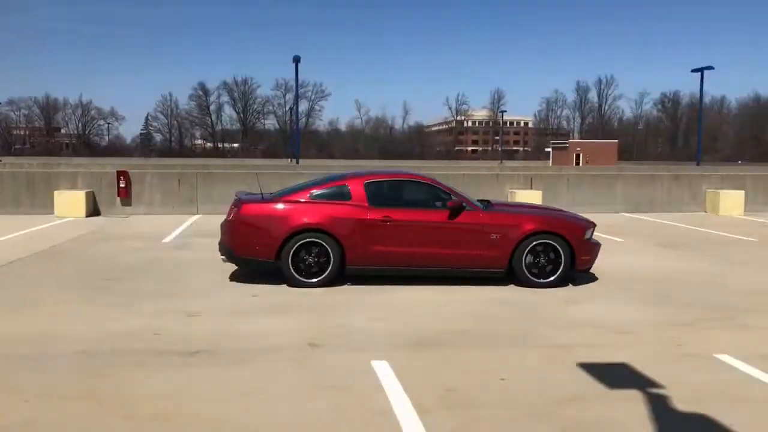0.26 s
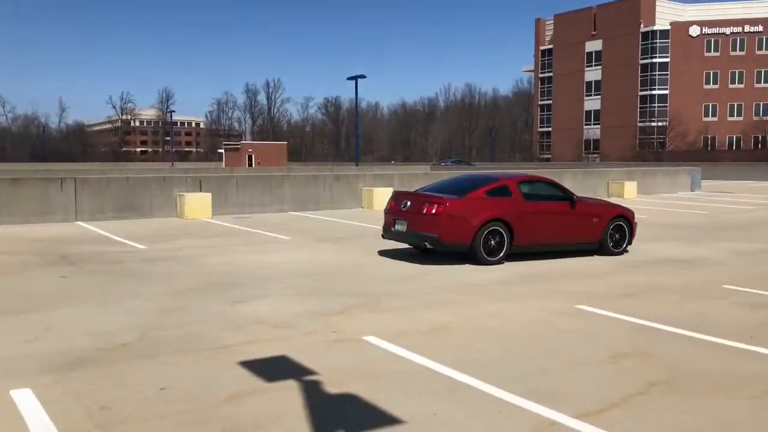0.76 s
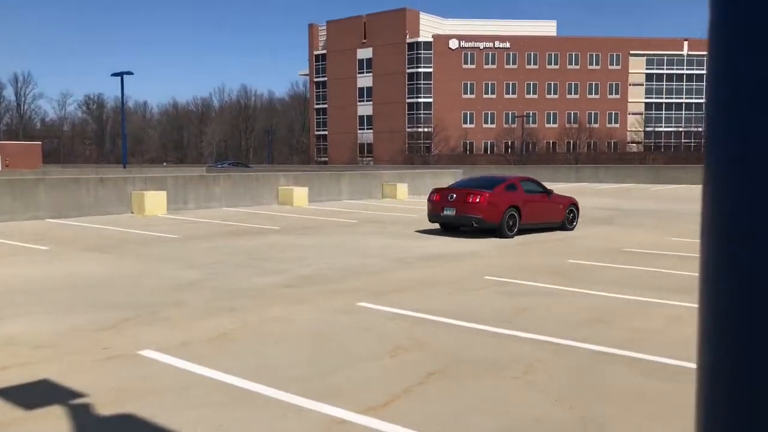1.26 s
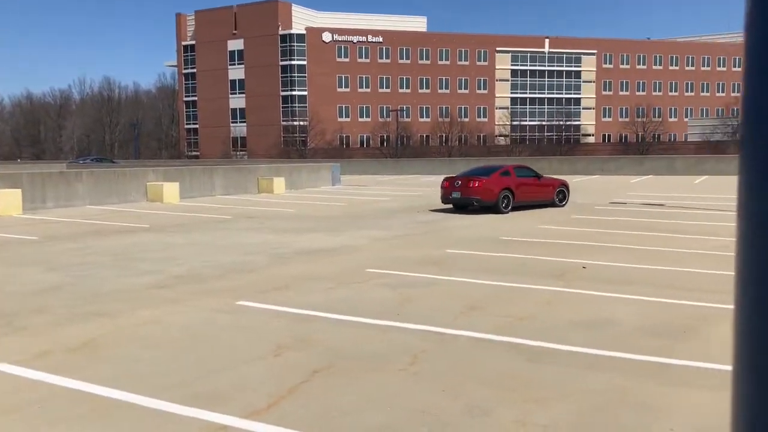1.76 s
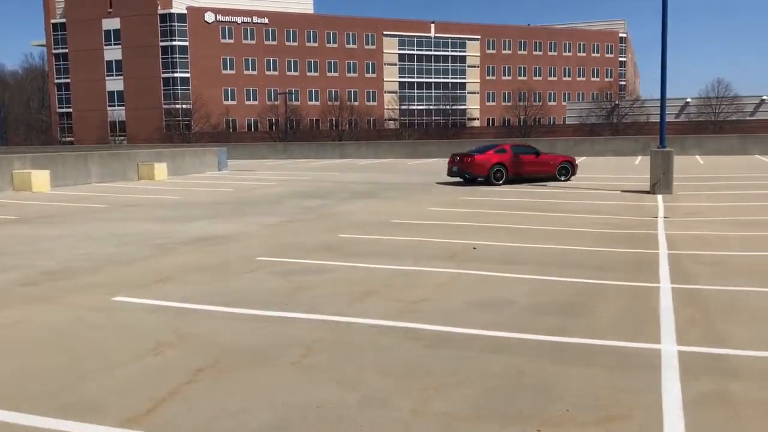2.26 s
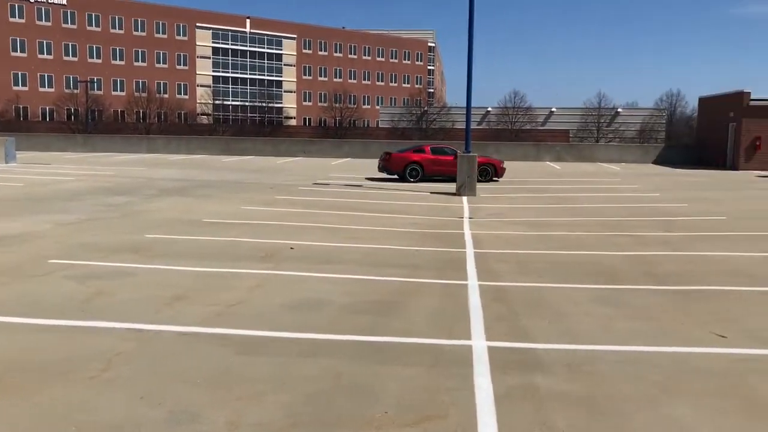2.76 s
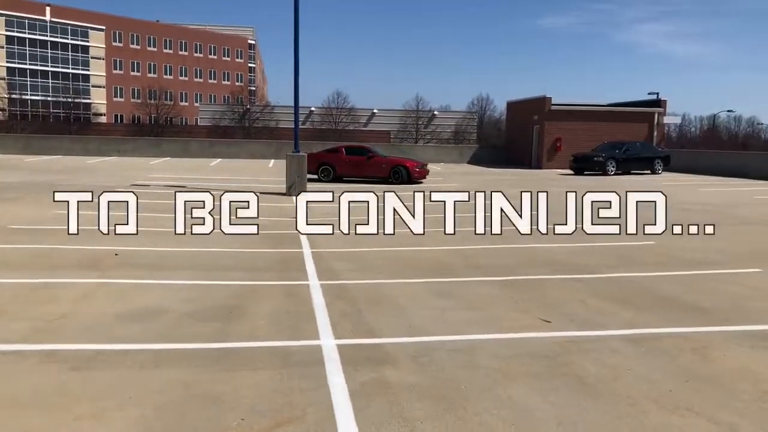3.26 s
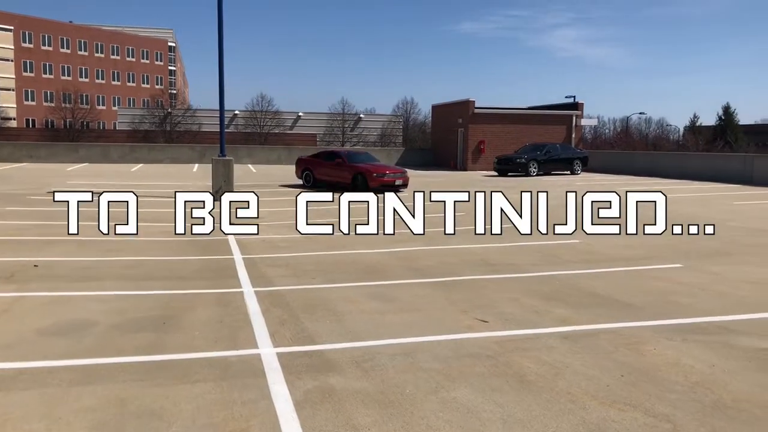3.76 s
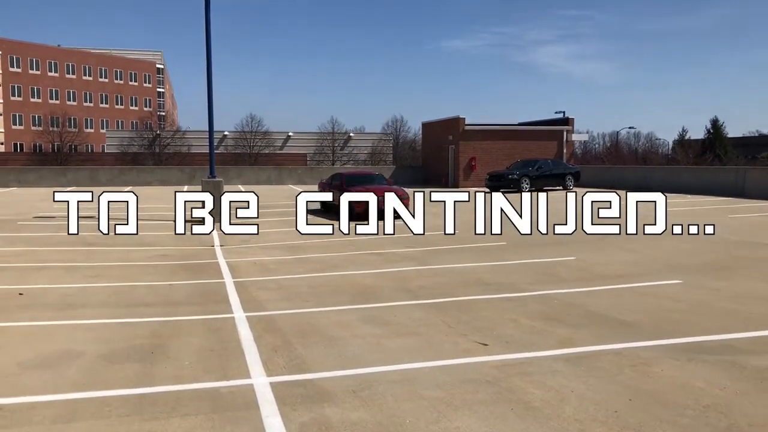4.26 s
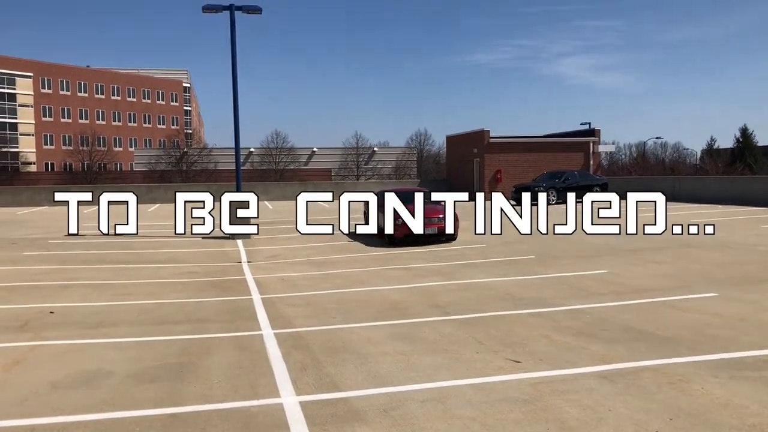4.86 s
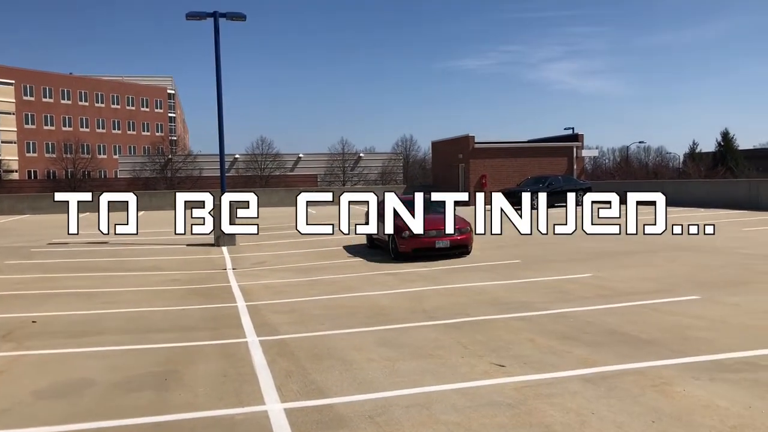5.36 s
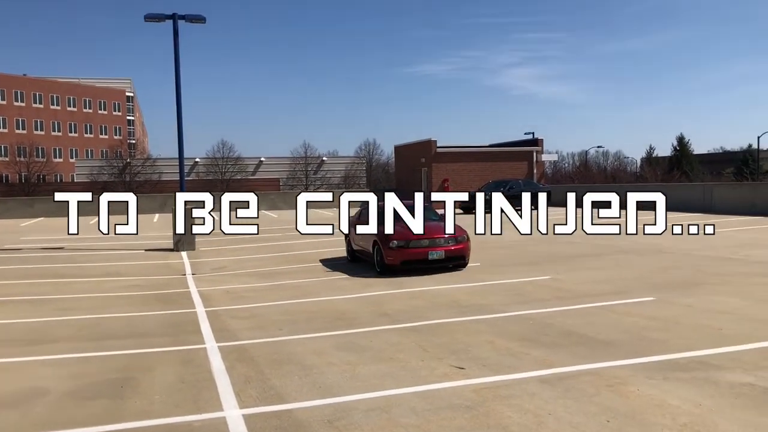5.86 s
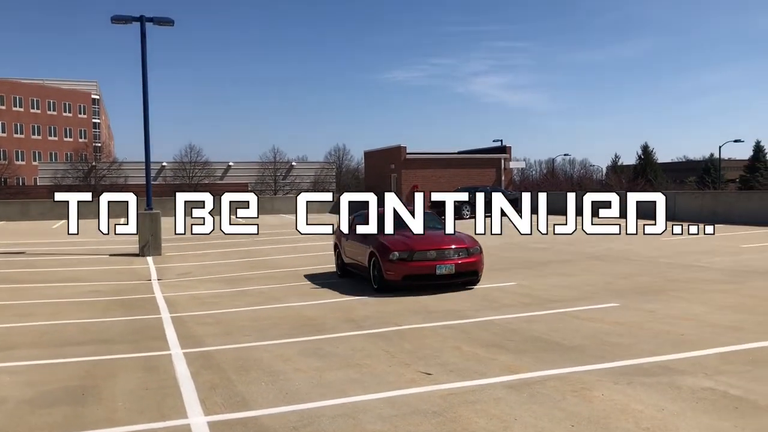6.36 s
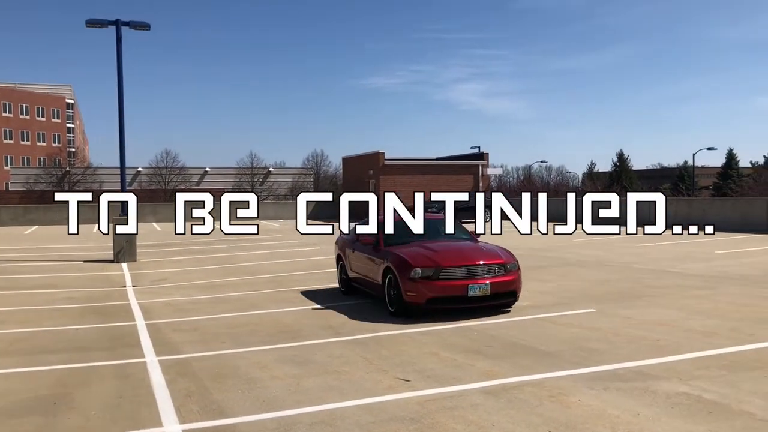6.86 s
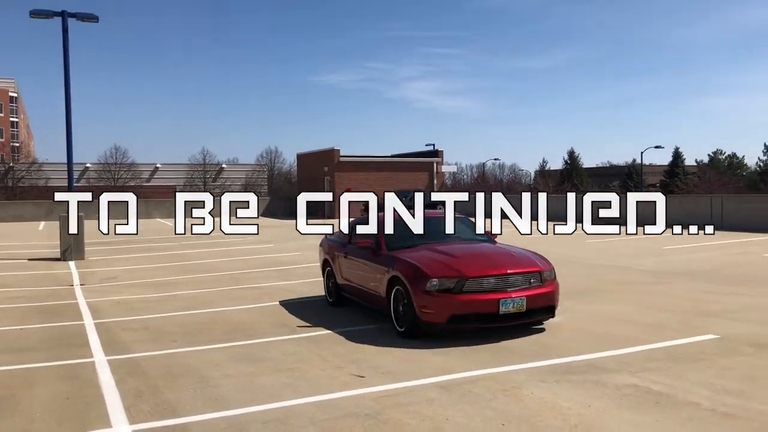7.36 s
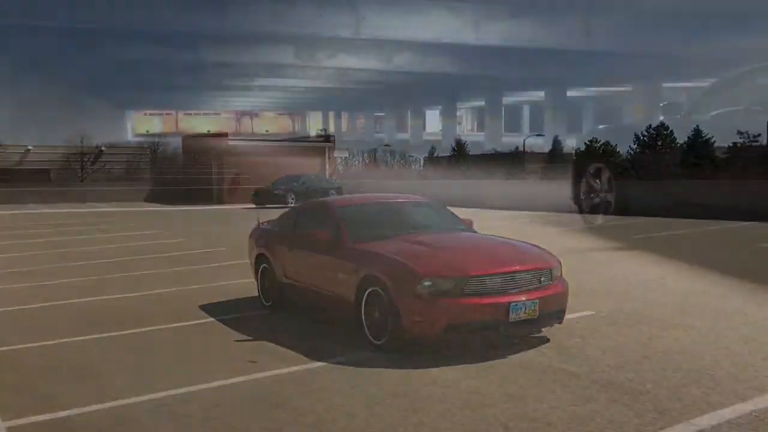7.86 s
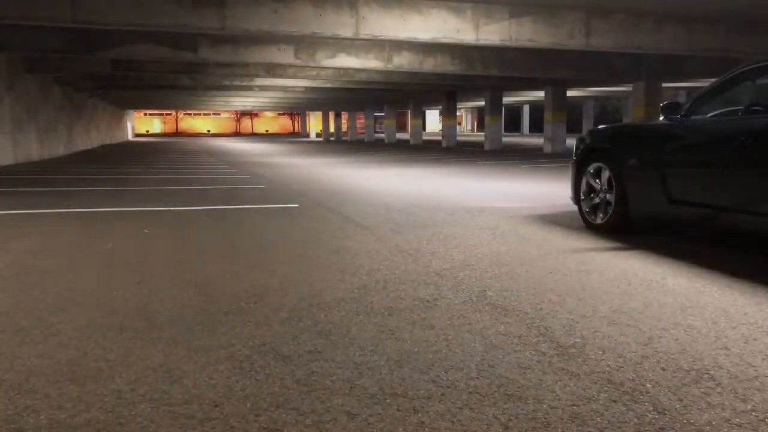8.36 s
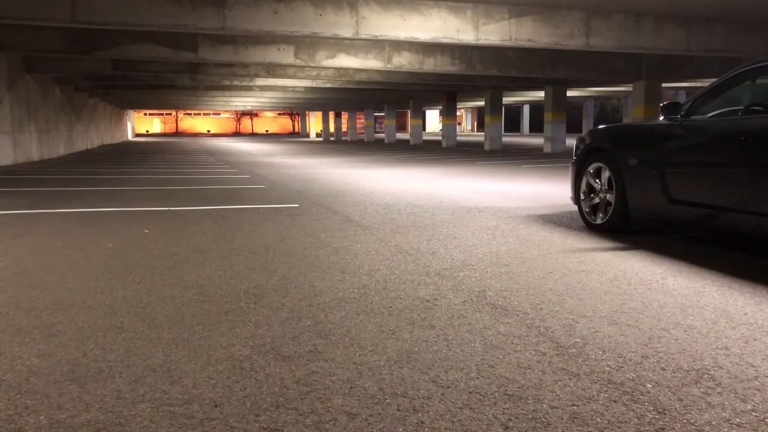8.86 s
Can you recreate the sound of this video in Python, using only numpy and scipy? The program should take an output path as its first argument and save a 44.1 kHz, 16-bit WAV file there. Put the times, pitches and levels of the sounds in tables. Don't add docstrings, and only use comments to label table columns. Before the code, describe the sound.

Outdoors on a concrete deck, a phone microphone hears a V8 car coasting away from 0 s, its low engine tone falling and dissolving by about 0.9 s into lumpy burble and soft exhaust pops, with tire roar receding. Brief chirps at 1.6 s lead into a squeal from 1.8 s, swelling through 2.5-3.5 s: several unstable pitches around 1.2 kHz, raspy, jumping and breaking, with higher strands and wall echoes. Two hard chirps at 4.05 and 4.12 s, the second lower, end it. Then it is quiet: faint rolling, a thin tire squeak at 4.6-5 s, distant town murmur, grit ticks and gusts, with a sharp wind thump near 6.3 s. At 7.56 s the sound cuts to a covered garage: a deep, uneven idle booming and resonating, with hissing fan and slight whine. From 8.56 s the fan drops and the idle eases, continuing to the end.

```python
import sys
import numpy as np
from scipy import signal
from scipy.fft import rfft, irfft
from scipy.io import wavfile
from scipy.ndimage import uniform_filter1d, minimum_filter1d

SR = 44100
rng = np.random.default_rng(int(sys.argv[2]) if len(sys.argv) > 2 else 0)


def invert_db(x):
    u = np.asarray(x, float) / 20
    return 10 ** u


def put_to_file(sound):
    columns = np.atleast_2d(sound).T
    safe = np.clip(columns, -1, 1)
    whole_steps = np.round(safe * 32767)
    wavfile.write(sys.argv[1], SR, whole_steps.astype(np.int16))


N = 401310


def unit(x):
    return x / np.sqrt(np.mean(x ** 2))


def even(x):
    return x / np.sqrt(uniform_filter1d(x ** 2, size=9000) + 1e-12)


def curves(table):
    s, *cols = np.transpose(np.vstack(table))
    t = np.arange(N) / SR
    gate = np.interp(t, [s[0] - 0.01, s[0], s[-1], s[-1] + 0.03], [0, 1, 1, 0])
    return [gate] + [np.interp(t, s, c) for c in cols]


def swell(s, hold, rise, fall):
    return np.interp(np.arange(N) / SR, [s - rise, s, s + hold, s + hold + fall], [0, 1, 1, 0])


def walk(rate):
    k = int(SR / rate)
    steps = np.repeat(rng.standard_normal(N // k + 1), k)
    return 1.3 * uniform_filter1d(uniform_filter1d(steps, k), k)[:N]


def held(rate):
    spell = np.cumsum(rng.random(N) < rate / SR)
    return uniform_filter1d(rng.standard_normal(N // 50)[spell], size=200)


def band(x, hz, width_hz):
    return signal.lfilter(*signal.iirpeak(min(hz, SR * 0.45), hz / width_hz, fs=SR), x)


def colour(x, points):
    hz, db = np.transpose(points)
    f = np.log(np.arange(N // 2 + 1) * SR / N + 1)
    outside = np.maximum(np.log(hz[0]) - f, 0) + np.maximum(f - np.log(hz[-1]), 0)
    return unit(irfft(rfft(x) * invert_db(np.interp(f, np.log(hz), db) - 30 * outside), N))


def lively(points, flicker_db, rate):
    spectrum = rfft(colour(rng.standard_normal(N), points))
    octave = np.log2(np.arange(len(spectrum)) * SR / N / 30 + 1e-9)
    out = 0
    for k in range(10):
        part = irfft(spectrum * np.clip(1 - abs(octave - k), 0, 1), N)
        out = out + part * invert_db(flicker_db * walk(rate))
    return unit(out)


def slaps(table):
    out, t = np.zeros(N), np.arange(4000) / SR
    for (s, peak_db, hz, length, sweep), turn in zip(table, rng.random((len(table), 1))):
        shape = np.sin(np.pi * np.clip(t / length, 0, 1)) ** 2
        slap = shape * np.sin(2 * np.pi * hz * t * (1 + sweep * t) + turn)
        out[int(s * SR):][:4000] += invert_db(peak_db) * slap
    return out


BANKS = [2, 1, -14, -3, -2, 0.5, -3.5, -24]


def firings(hz, jitter, scatter_db):
    turns = np.cumsum(hz * (1 + jitter * walk(40))) / SR
    at = np.flatnonzero(np.diff(np.floor(turns)))
    scatter = np.clip(rng.standard_normal(N // 50), -2, 2)[:len(at)]
    pulses = np.zeros(N)
    pulses[at] = invert_db(np.resize(BANKS, len(at)) + scatter_db * scatter)
    return pulses


# frequency in Hz, density in dB per Hz.
TOWN = [(18, -38), (30, 2.5), (103, 0.5), (287, -8.5), (394, -6.5), (540, -10.5), (844, -10), (1500, -15),
        (2750, -32), (4300, -28.5), (5590, -38.5), (8300, -39.5), (12600, -54), (14800, -46.5),
        (16000, -52.5)]


def town():
    return invert_db(-47) * lively(TOWN, 1.7, 6)


# frequency in Hz, density in dB per Hz.
BUFFET = [(15, -41), (25, -13), (59, 1.5), (145, 2), (312, -13.5), (442, -19), (545, -22.5), (584, -10.5),
          (700, -42), (910, -58), (1540, -120)]
# start in seconds, hold in seconds, buffet in dB.
GUSTS = [(1.201, 0.36, -39.5), (1.647, 0.035, -36.5), (1.873, 0.041, -36.5), (2.033, .17, -37.5),
         (2.49, 0.12, -45), (2.81, 0.083, -43.5), (2.994, 0.27, -46.5), (3.302, 0.23, -46),
         (3.756, 0.099, -52), (4.147, 0.11, -45.5), (4.748, 0.08, -59), (4.94, 0.025, -50),
         (5.197, 0.19, -47), (5.55, 0.17, -58), (5.975, 0.022, -55), (6.12, .03, -50), (6.272, 0.062, -36),
         (6.393, 0.097, -44.5), (6.812, 0.014, -44), (6.982, 0.02, -43), (7.24, 0.07, -46)]
# start in seconds, peak in dB, pitch
# in Hz, length in seconds, upward sweep per second.
THUMPS = [(1.991, -32.5, 343, 0.048, 2), (2.795, -43, 249.4, 0.07, 4.5), (4.9470, -31, 110, 0.026, 4),
          (4.951, -46, 479, .066, 0.5), (5.028, -43.5, 422, 0.038, 0), (5.07, -50, 393, 0.064, -0.5),
          (4.962, -35, 85, .035, -3), (5.207, -38, 109, .04, -1.5), (5.32, -41, 200, 0.028, 3),
          (5.329, -39, 80, 0.04, -2), (5.815, -46, 388, 0.074, -0.3), (5.1950, -34, 165, 0.024, 0),
          (5.359, -36.5, 317, 0.022, 3), (6.229, -30, 105, 0.019, 0), (6.272, -23.5, 256, 0.0173, 25),
          (6.277, -19.5, 534, 0.0096, 4.5), (6.278, -27, 930, 0.0057, -13), (6.283, -21, 246, 0.017, -2),
          (6.292, -35, 89, 0.047, -1), (6.372, -33.5, 200, 0.025, 10.5), (6.818, -30.5, 95, 0.019, 11)]
BREEZE_DB, GUST_RISE_S, GUST_FALL_S = -58.5, 0.037, 0.07


def wind():
    gusts = invert_db(BREEZE_DB)
    for s, hold, db in GUSTS:
        gusts = gusts + invert_db(db) * swell(s, hold, GUST_RISE_S, GUST_FALL_S)
    return gusts * lively(BUFFET, 3.1, 17) + slaps(THUMPS)


# start in seconds, peak in dB, pitch in Hz.
TICKS = [(4.6374, -59, 12000), (4.9975, -53, 13500), (5.2844, -42.5, 6640), (5.3906, -55, 5450),
         (5.5777, -52, 8170), (5.8595, -38, 2500), (5.8595, -36.5, 5600), (6.5987, -43, 6470),
         (7.2035, -51, 8350), (7.375, -55, 13000), (7.412, -54, 13000), (7.487, -39, 6440),
         (8.249, -36, 5040), (8.486, -39, 6690)]


def grit():
    out = np.zeros(N)
    decay = np.exp(-np.arange(400) / 20)
    for (s, db, hz), noise in zip(TICKS, rng.standard_normal((len(TICKS), 400))):
        crack = band(band(noise * decay, hz, 5500), hz, 5500)
        out[int(s * SR):][:400] += invert_db(db + 2) * crack / np.max(abs(crack))
    return out


# frequency in Hz, density in dB per Hz.
HALL = [(15, -44), (25, -23), (47, 4), (81, 3), (112, -3), (151, 3), (188, -21), (243, -4), (357, -10),
        (413, -21), (461, -27), (525, -19), (564, -15), (743, -20), (2000, -64), (2600, -58), (4400, -120)]
# frequency in Hz, width in Hz, level in dB.
HALL_MODES = [(57.6, 9, -7), (113.3, 16, 0), (127, 22, -0.5), (143.8, 6, -7), (247.5, 7.4, -12),
              (286.7, 8.2, -16), (351.6, 6.1, -12), (375, 5.5, -16.5), (470, 8.9, -21), (543, 14, -31),
              (574, 6.8, -17.5)]
# frequency in Hz, density in dB per Hz.
FAN = [(590, 0), (1000, 0), (1180, -4), (1340, -2), (2310, -11), (2680, -9.5), (3620, -14), (8070, -18.5),
       (10800, -24.5), (15100, -28), (16000, -29)]
# time in seconds, change in dB.
STUMBLES = [
    (7.785, -9),
    (8.335, -4),
    (8.66, -5),
]
LEVEL_S, IDLE_HZ, IDLE_DB, FAN_DB = 7.5622, 57.73, -32, -51
FAN_OFF_S, IDLE_EASES_DB, FAN_EASES_DB = 8.56, -2.5, -7.5
IDLE_LINES_DB, IDLE_DRIFT = -3, 0.012
DRONE_S, DRONE_HOLD_S, DRONE_DB = 8.02, 0.27, 10
STEP_DB, STEP_HZ, STEP_S = -23, 85, 0.0064


def garage():
    gate, eased = swell(LEVEL_S, 9, 1 / SR, 1), swell(FAN_OFF_S, 9, 0.0044, 1)
    idle_db = IDLE_DB + IDLE_EASES_DB * eased + walk(11)
    for s, db in STUMBLES:
        idle_db = idle_db + db * swell(s, 0.015, 0.033, 0.012)
    fan_db = FAN_DB + FAN_EASES_DB * eased

    pulses = firings(np.full(N, IDLE_HZ), 0.0205, 5.5)
    t = np.arange(SR // 2) / SR
    hall_tail = rng.standard_normal(len(t)) * invert_db(-60 * t / 0.3)
    blurred = signal.fftconvolve(pulses, hall_tail)[:N]
    drone_db = DRONE_DB * swell(DRONE_S, DRONE_HOLD_S, 0.12, 0.04)
    rings, hum = 0, 0
    for hz, width, db in HALL_MODES:
        rings = rings + invert_db(db) * even(band(band(pulses, hz, width), hz, 3 * width))
        hum_db = db + 3.1 * walk(6) + (hz < 80) * drone_db
        hum = hum + invert_db(hum_db) * np.sin(2 * np.pi * hz * np.cumsum(1 + IDLE_DRIFT * walk(9)) / SR)
    boom = 0.6 * colour(blurred, HALL) + 0.5 * lively(HALL, 2.5, 12)
    boom = unit(boom + 0.9 * unit(rings) + invert_db(IDLE_LINES_DB) * unit(hum))
    boom = boom / np.sqrt(uniform_filter1d(boom ** 2, size=5000))

    whine = 0
    for hz, db in [(2680, 1.0), (3000, -3.5)]:
        whine = whine + invert_db(db - 2.5 + 5 * walk(40)) * unit(band(rng.standard_normal(N), hz, 160))
    fan = invert_db(fan_db + 2.5) * (lively(FAN, 1.2, 25) + 0.27 * whine)

    since = np.clip(np.arange(N) / SR - LEVEL_S, 0, 9)
    step = invert_db(STEP_DB) * np.exp(-since / STEP_S) * np.cos(2 * np.pi * STEP_HZ * since)
    idle = np.clip(since / STEP_S / 2, 0, 1) * invert_db(idle_db) * boom
    return gate * (step + idle + np.clip(0.47 + since / 0.054, 0, 1) * fan)


# time in seconds, firing rate in Hz, firing tone in dB, burble in dB.
COAST = [
    (0.0, 258.5, -28.5, -28),
    (0.45, 227.7, -26, -34.5),
    (0.58, 218.3, -30.5, -28),
    (0.76, 208.4, -36, -25.5),
    (0.97, 195.4, -47, -27.5),
    (1.5, 158.8, -47, -40),
    (1.86, 140, -48, -39.5),
    (2.11, 138.7, -51, -39.5),
    (2.4, 114.7, -48, -37.5),
]
# multiple of the four-stroke cycle, level in dB.
ORDER = [(1, -37), (2, -21), (3, -16), (4, -22), (5, -17), (6, -11), (7, -16), (8, 0), (9, -18), (10, -20),
         (11, -9), (12, -22)]
# frequency in Hz, density in dB per Hz.
EXHAUST = [(18, -47), (30, -24), (54, -4.5), (183, 0.5), (347, -2.5), (383, -1), (436, -21), (604, -4),
           (900, -40), (1170, -26), (1980, -120)]
# start in seconds, peak in dB, pitch in Hz, length in seconds,
# upward sweep per second.
POPS = [(.715, -34, 382, 0.056, 0.15), (.795, -28, 227, 0.054, 1.3), (.845, -30, 300, .05, 2),
        (.91, -32, 290, .05, 1.5), (.985, -33, 383, 0.083, -0.25), (1.24, -31, 190, 0.069, 0),
        (.2, -34, 85, .08, -0.35), (1.35, -29, 130, 0.058, 0.4)]
SIDE_ORDERS_DB_PER_S = -7
THIRD_DB, THIRD_S, THIRD_HOLD_S = -43.5, 0.35, 0.6


def engine():
    gate, hz, tone_db, burble_db = curves(COAST)
    t = np.arange(N) / SR
    cycle = 2 * np.pi * np.cumsum(hz / 8) / SR
    tone = 0
    for k, db in ORDER:
        order_db = db + (0.7 - 0.12 * db) * walk(9) + (k != 8) * SIDE_ORDERS_DB_PER_S * t
        tone = tone + np.sqrt(2) * invert_db(order_db) * np.sin(k * cycle + 6 * rng.random())
    fade = np.clip((0.9 - t) / 0.11, 0, 1)
    lumps = colour(firings(hz, 0.1, 3.5), EXHAUST)
    burble = unit((1 - 0.26 * fade) * lumps + 1.7 * lively(EXHAUST, 2.1, 12.12))
    third = invert_db(THIRD_DB + 3 * walk(15)) * swell(THIRD_S, THIRD_HOLD_S, 0.1, 0.1) * np.sin(24 * cycle)
    exhaust = fade * tone * invert_db(tone_db) + burble * invert_db(burble_db - 1.8 * fade - 4)
    return slaps(POPS) + third + gate * exhaust


# time in seconds, roar in dB.
ROAD = [(0.0, -34), (0.65, -35), (1.1, -41.5), (1.5, -42), (2.0, -46.5), (3.3, -43), (4.05, -50.5),
        (4.14, -47), (4.2, -52.5), (4.45, -59), (5.1, -62), (6.2, -58), (7.0, -56.5), (7.55, -54.5)]
# frequency in Hz, density in dB per Hz.
ROAR = [(180, -27.5), (300, -5), (383, -2), (432, -6.5), (608, -2), (930, -2), (1060, -1.5), (2000, -8.5),
        (3140, -19.5), (4060, -43.5), (5500, -36.5), (7150, -56), (12100, -120)]
# frequency in Hz, density in dB per Hz.
HISS = [(2060, -21), (2600, -15), (2950, -13.5), (3500, -2.5), (4080, -4), (5460, -12.5), (6820, -13),
        (10300, -24), (15100, -31.5), (16000, -31)]
# start in seconds, length in seconds, hiss in dB.
SCUFFS = [(1.27, 0.3, -53.5), (1.596, 0.087, -48), (1.714, 0.45, -49.5), (2.677, 0.17, -50.5),
          (2.975, .1, -49), (3.416, 0.176, -49.5), (3.625, 0.12, -49.5), (4.065, 0.074, -50.5)]
HISS_BELOW_DB, HISS_SLOPE = -11.5, 1.1
AIR_DB = -9
SLIDE_S, SLIDE_LENGTH_S, SLIDE_HISS_DB = 1.6, 2.52, -54


def road():
    gate, roar_db = curves(ROAD)
    full_db = ROAD[0][1]
    rolling = invert_db(full_db + HISS_BELOW_DB + HISS_SLOPE * (roar_db - full_db))
    sliding = invert_db(SLIDE_HISS_DB) * swell(SLIDE_S, SLIDE_LENGTH_S, 0.02, 0.068)
    for s, hold, db in SCUFFS:
        sliding = np.maximum(sliding, invert_db(db) * swell(s, hold, 0.019, 0.0214))
    fizz = invert_db(AIR_DB) * rolling * unit(band(rng.standard_normal(N), 13500, 6000))
    roar = invert_db(roar_db + 3) * lively(ROAR, 1.3, 18)
    hiss = invert_db(4) * np.hypot(rolling, sliding) * lively(HISS, 1.1, 24.98)
    return gate * (fizz + roar + hiss)


# time in seconds, squeak in dB, hiss in dB.
SCRUB = [
    (4.55, -60, -92),
    (4.622, -52.5, -69),
    (4.71, -56, -70),
    (4.76, -53.5, -61.5),
    (4.868, -50, -67),
    (4.98, -61, -77),
    (5.0, -76, -77),
]
# pitch in Hz, level in dB, start in seconds, hold in seconds.
STREAKS = [(5400, -7, 4.82, .09), (6200, -9, 4.82, .17), (8700, -22, 4.76, .1), (10000, -23, 4.75, .12),
           (11400, -23, 4.8, .15), (12900, -18, 4.73, .08), (14800, -16, 4.73, .17)]


def scrub():
    gate, squeak_db, hiss_db = curves(SCRUB)
    squeak = unit(band(rng.standard_normal(N), 1680, 70))
    rising = 1 - 0.12 * np.exp(-np.clip(np.arange(N) / SR - 4.72, 0, 1) / 0.035)
    thin = 0
    for hz, db, s, hold in STREAKS:
        level = invert_db(db - 1.5 - hz / 9000 + 4 * walk(60)) * swell(s, hold, 0.015, 0.02)
        thin = thin + level * np.sin(2 * np.pi * hz * np.cumsum(rising + hz * 0.9e-6 * walk(150)) / SR)
    patch = unit(band(band(rng.standard_normal(N), 3250, 1300), 3300, 1500)) * invert_db(2.3 * walk(28))
    return gate * (invert_db(squeak_db) * squeak + invert_db(hiss_db + 5.5) * (patch + thin))


# delay in seconds, level in dB.
ECHOES = [(.062, -23), (.085, -29), (.1, -24), (.135, -27), (.17, -28), (.21, -36), (.25, -33), (.27, -31),
          (.288, -32), (.35, -43), (.378, -45), (.4, -44), (.5, -46)]
YARD_T60_S, YARD_DB = 0.48, -11
LATE_TREBLE_DB_PER_S = -30


def yard(x):
    t = np.arange(SR) / SR
    tail = rng.standard_normal(SR) * invert_db(-60 * t / YARD_T60_S) * np.clip(t / 0.033, 0, 1)
    response = invert_db(YARD_DB - 3) * tail / np.sqrt(np.sum(tail ** 2))
    for (s, db), facets in zip(ECHOES, rng.standard_normal((len(ECHOES), 600))):
        response[int(s * SR)] += invert_db(db - 2.5)
        response[int(s * SR):][:600] += invert_db(db - 31) * facets
    middle = band(x, 1330, 930)
    treble = 2.2 * band(band(x, 3000, 1400), 3000, 1400)
    late_dull = response * invert_db(LATE_TREBLE_DB_PER_S * t)
    return (signal.fftconvolve(middle, response) + signal.fftconvolve(treble, late_dull))[:N]


# start in seconds, peak in dB, from Hz, to Hz,
# length in seconds.
STRANDS = [(4.049, -28, 2095, 2194, .012), (4.059, -30, 3906, 3463, .008), (4.086, -32, 2090, 2140, 0.013),
           (4.087, -44, 3500, 3480, 0.014), (1.612, -36.5, 2900, 3300, 0.05), (1.863, -38, 2750, 2670, .06),
           (2.02, -34, 2700, 2620, 0.056), (2.9, -30.5, 2380, 2630, 0.09), (2.982, -35, 2950, 2670, 0.049),
           (3.017, -29.5, 2280, 2397, 0.076), (3.12, -37, 2500, 2370, 0.052),
           (3.192, -29.5, 3045, 3080, 0.037), (3.244, -33, 3050, 3210, 0.038),
           (3.35, -37, 2700, 2850, 0.069), (3.448, -27, 1950, 1990, .025), (3.51, -32, 2300, 2770, 0.05),
           (3.571, -34, 2780, 2636, 0.074), (3.589, -32.5, 2160, 2100, 0.052),
           (3.696, -31.5, 2250, 2110, 0.027), (3.784, -39.5, 2750, 2890, 0.021),
           (2.01, -42, 3900, 4020, 0.087), (2.127, -37, 2550, 2450, .08), (2.3, -40, 3200, 3346, 0.02),
           (2.452, -34.5, 2300, 2460, .13), (2.598, -41, 3900, 3990, .07), (2.7, -32, 2480, 2410, 0.086),
           (2.72, -38.5, 3500, 3700, 0.076), (2.76, -39.5, 4100, 4200, 0.036),
           (3.049, -39.5, 3500, 3590, .1), (3.25, -32.5, 2250, 2060, 0.12), (3.41, -35, 2100, 2300, 0.088),
           (3.452, -40, 3350, 3630, .02), (4.059, -50, 7000, 7000, 0.016)]


def strands():
    out, t = 0, np.arange(N) / SR
    waver, flutter = 0.008 * walk(100) + 0.03 * walk(500), invert_db(4.5 * walk(200) - 1.5)
    for s, db, from_hz, to_hz, length in STRANDS:
        hz = np.interp(t, [s, s + length], [from_hz, to_hz]) * (1 + waver)
        shape = swell(s + 0.0054, length, 0.0043, 0.0082)
        out = out + invert_db(db) * shape * np.sin(2 * np.pi * np.cumsum(hz) / SR)
    return out * flutter


def slip(phase, over_db):
    overtones = np.sin(2 * phase) + 0.23 * np.sin(3 * phase) + 0.052 * np.sin(4 * phase)
    return np.sin(phase) + invert_db(over_db) * overtones


SNAP_DB, SNAP_DB_PER_OCTAVE = -33.5, 23


def snap(hz):
    return SNAP_DB + SNAP_DB_PER_OCTAVE * np.log2(hz / 1400)


# start in seconds, peak in dB, pitch in Hz, rise in seconds, hold in seconds.
CHIRPS = [(1.607, -19, 1336, 0.0066, 0.021), (1.634, -26.5, 1372, 0.0092, 0.032),
          (1.699, -24.5, 1290, 0.03, 0.024), (1.881, -20, 1296, 0.0068, 0.029),
          (2.515, -10.5, 1203, 0.0077, 0.015), (2.716, -11, 1200, 0.003, 0.026),
          (2.744, -10, 1200, 0.0085, 0.027), (3.204, -14.5, 1555, 0.008, 0.05),
          (3.439, -11, 1750, 0.0034, 0.0027), (3.46, -10, 1809, 0.0038, .0015),
          (3.404, -15, 1774, .003, .009), (3.478, -12.5, 1680, 0.0026, .008),
          (3.794, -30, 1396, 0.0047, 0.021), (3.894, -40.5, 897, 0.013, 0.051),
          (4.022, -26, 1533, 0.0089, .01), (2.014, -17, 1328, .003, 0.014),
          (3.585, -19, 1370, 0.0094, 0.036), (4.095, -21.5, 1480, .003, 0.0034)]


def chirps():
    out, t, judder = np.zeros(N), np.arange(6000) / SR, invert_db(2 * walk(160))
    bent = t + 0.00025 * (1 - np.exp(-t / 0.00098))
    for s, db, hz, rise, hold in CHIRPS:
        attack = np.clip(t / rise, 0, 1)
        release = np.clip((rise + hold - t) / (1.45 * rise) + 1, 0, 1)
        shape = judder[int(s * SR):][:6000] * attack * release
        out[int(s * SR):][:6000] += invert_db(db) * shape * slip(2 * np.pi * hz * bent, snap(hz))
    return out


# time in seconds, pitch in Hz, peak in dB.
REGRIP = [
    [(4.046, 1613, -29), (4.056, 1879, -33), (4.06, 2017, -24), (4.064, 1738, -5.5), (4.068, 1750, -10.5),
     (4.077, 1770, -9), (4.084, 1757, -16), (4.0885, 1765, -13), (4.096, 1890, -38)],
    [(4.104, 1553, -29), (4.113, 1540, -23), (4.1165, 1527, -6.5), (4.12, 1447, -14), (4.127, 1398, -2.5),
     (4.134, 1403, -7), (4.14, 1416, -10.5), (4.148, 1447, -19), (4.154, 1480, -37)],
]


def regrip():
    out = 0
    for table in REGRIP:
        gate, hz, db = curves(table)
        over_db = snap(hz) + 4.4 * walk(200)
        phase = 2 * np.pi * np.cumsum(hz * (1 + 0.01195 * walk(400))) / SR
        out = out + gate * invert_db(db) * slip(phase, over_db)
    return out


# start in seconds, peak in dB, pitch in Hz, hold in seconds.
SINGS = [(1.807, -33, 1328, 0.047), (1.831, -26.5, 1440, 0.027), (1.858, -29.5, 1306, 0.024),
         (1.928, -19.5, 1281, .034), (1.969, -25, 1330, 0.031), (2.041, -23.5, 1348, 0.035),
         (2.09, -23.5, 1290, 0.043), (2.127, -24, 1236, 0.026), (2.202, -23, 1337, 0.015),
         (2.248, -22, 1184, 0.031), (2.282, -20.5, 1230, 0.027), (2.368, -20, 1277, 0.042),
         (2.46, -18.5, 1236, 0.022), (2.483, -19.5, 1183, .027), (2.543, -17, 1200, 0.029),
         (2.554, -22, 1372, 0.047), (2.596, -18.5, 1115, 0.03), (2.659, -20.5, 1330, 0.033),
         (2.799, -17.5, 1220, 0.018), (2.843, -22, 1339, 0.058), (2.867, -21, 1147, 0.029),
         (2.93, -28, 1260, 0.028), (2.99, -24, 1336, 0.039), (3.05, -18.5, 1178, 0.055),
         (3.111, -17.5, 1230, 0.032), (3.158, -15, 1178, 0.04), (3.204, -19, 1122, 0.028),
         (3.254, -22, 1207, 0.019), (3.32, -26, 1055, 0.034), (3.385, -22.5, 1050, 0.018),
         (3.389, -28, 1783, 0.043), (3.44, -22.5, 1130, .04), (3.545, -27.5, 1057, 0.032),
         (3.494, -20.5, 1704, 0.026), (3.653, -24.5, 1362, .03), (3.676, -24, 1103, 0.046),
         (3.808, -25, 1094, 0.03), (3.847, -23, 1307, 0.018)]
SING_RISE_S, SING_WOBBLE = 0.0065, 0.00988


def sings(snap_db):
    out, rule = 0, 0
    bend, edge_db = np.cumsum(1 + SING_WOBBLE * walk(60)) / SR, snap_db + 3 * walk(50)
    judder = walk(120)
    for s, db, hz, hold in SINGS:
        shape = swell(s + SING_RISE_S, hold, SING_RISE_S, 1.7 * SING_RISE_S)
        rule = np.maximum(rule, shape)
        out = out + invert_db(db) * shape * np.sin(2 * np.pi * hz * bend)
        out = out + invert_db(db + edge_db) * shape * np.sin(4 * np.pi * hz * bend + 1.8 * judder)
    return out * invert_db(1.5 * judder), rule


# frequency in Hz, density in dB per Hz.
RASP = [(350, -49), (600, -55), (817, -20), (1160, -5.5), (1260, -0.5), (1600, -10), (1870, -15),
        (2650, -17), (3060, -32), (4040, -23.5), (6000, -51), (7800, -71), (13200, -120)]


def squeal(gain, hz, spread, over_db, count=6):
    out = 0
    for _ in range(count):
        wander = np.abs(spread) * (0.8 * np.clip(held(30), -1.6, 1.6) + 0.55 * walk(250))
        grip = invert_db(1.5 * held(40) + 4.35 * walk(140))
        out = out + grip * slip(2 * np.pi * np.cumsum(hz * (1 + wander)) / SR, over_db + 4 * walk(30))
    tones = out / np.sqrt(uniform_filter1d(out ** 2, size=6000))
    return gain * (tones + invert_db(-6) * lively(RASP, 4, 40))


# time in seconds, slip pitch in Hz, level in dB.
OUTER = [
    (1.77, 1320, -33),
    (1.9, 1305, -24),
    (2.37, 1256, -22),
    (2.55, 1202, -19.5),
    (2.95, 1191, -22),
    (3.19, 1178, -19),
    (3.38, 1119, -25),
    (3.7, 1149, -25),
    (4.039, 1275, -33),
]
# start in seconds, length in seconds, pitch in Hz, level in dB.
BITES = [(1.646, 0.026, 1515, -31), (1.776, 0.094, 1532, -34.5), (2.422, 0.1, 1519, -35.5),
         (2.79, 0.091, 1623, -31), (3.121, 0.18, 1575, -24), (3.362, 0.16, 1742, -24.5),
         (3.58, 0.092, 1372, -26), (4, 0.048, 1537, -33.5)]
SPREAD, SPREAD_PER_S, OUTER_SNAP_DB = 0.038, 0.012, -13.5
INNER_HZ, INNER_DB, INNER_SPREAD, INNER_SNAP_DB = 1519, -36.5, 0.07, -12
BITE_RISE_S, BITE_FALL_S, INNER_HOLD_S = 0.03, 0.04, 1.95
SNAP_FADES_DB_PER_S, LOAD_SOFTENS = -3, 0.99
SNAP_DIES_S, SNAP_DIES_DB_PER_S = 3.54, -40
OTHERS_YIELD_DB = -3


def slide():
    gate, hz, db = curves(OUTER)
    since = np.arange(N) / SR - SLIDE_S
    spread = SPREAD + SPREAD_PER_S * np.clip(since, 0, SLIDE_LENGTH_S)
    dying_db = SNAP_DIES_DB_PER_S * np.clip(np.arange(N) / SR - SNAP_DIES_S, 0, 1)
    outer_snap_db = dying_db + OUTER_SNAP_DB + SNAP_FADES_DB_PER_S * since

    bites = np.array([swell(s, hold, BITE_RISE_S, BITE_FALL_S) for s, hold, _, _ in BITES])
    bite_hz, bite_db = np.array(BITES)[:, 2], np.array(BITES)[:, 3]
    inner_hz = INNER_HZ + (bite_hz - INNER_HZ) @ bites
    murmur = invert_db(INNER_DB) * swell(OUTER[0][0], INNER_HOLD_S, 0.027, 0.47)
    inner_gain = murmur + invert_db(bite_db) @ bites
    inner_snap_db = dying_db + INNER_SNAP_DB - LOAD_SOFTENS * (bite_db - INNER_DB) @ bites

    notes, rule = sings(outer_snap_db)
    outer = squeal(gate * invert_db(db + OTHERS_YIELD_DB * rule), hz, spread, outer_snap_db)
    return notes + outer + squeal(inner_gain, inner_hz, INNER_SPREAD, inner_snap_db, count=4)


def scene():
    tyres = slide() + chirps() + regrip() + strands()
    around = town() + wind() + grit() + garage()
    return (around + engine() + road() + scrub() + yard(tyres) + tyres)[None]


def roll_off(x):
    return signal.sosfilt(signal.butter(12, 16630, fs=SR, output="sos"), x)


def record(dry):
    room_left = np.minimum(1, 0.56 / (abs(dry) + 1e-9))
    held_down = dry * uniform_filter1d(minimum_filter1d(room_left, size=200), size=200)
    bass_cut = signal.butter(4, 42, "high", fs=SR, output="sos")
    top_cut = signal.ellip(8, 0.2, 70, 15820, fs=SR, output="sos")
    mix = signal.sosfilt(top_cut, signal.sosfilt(bass_cut, held_down))
    return roll_off(mix)


dry = scene()
out = record(dry)
put_to_file(out)
```